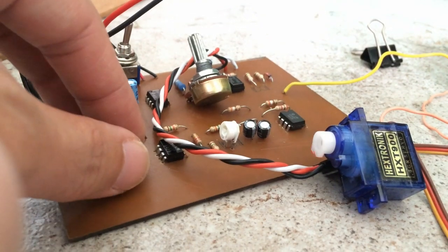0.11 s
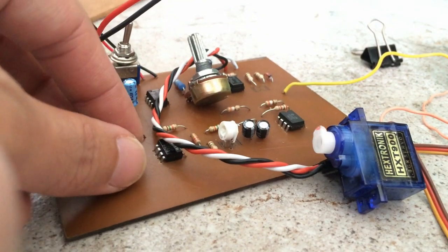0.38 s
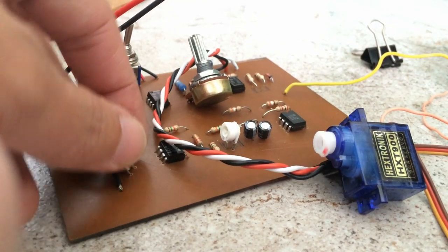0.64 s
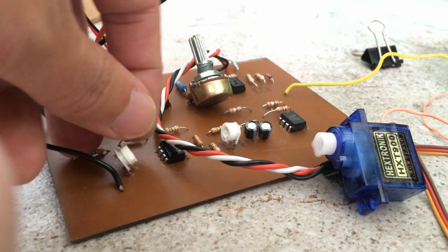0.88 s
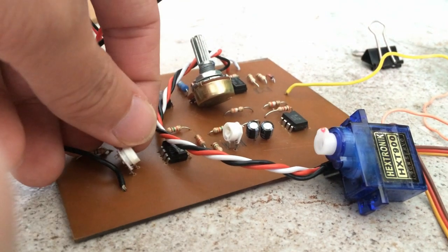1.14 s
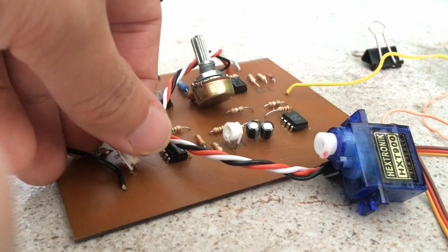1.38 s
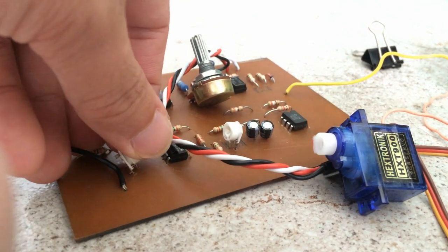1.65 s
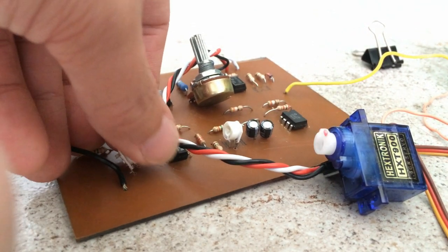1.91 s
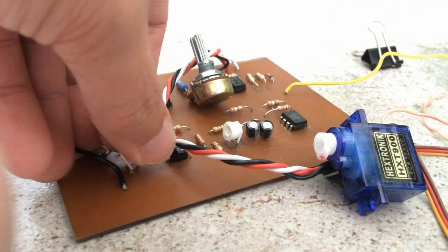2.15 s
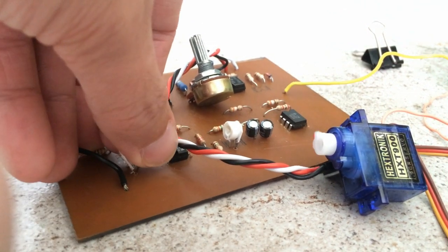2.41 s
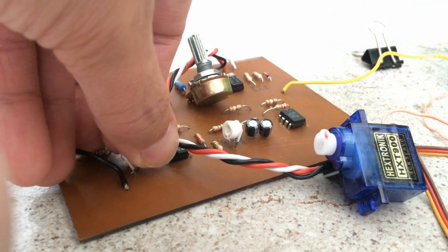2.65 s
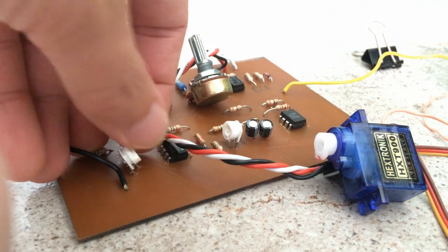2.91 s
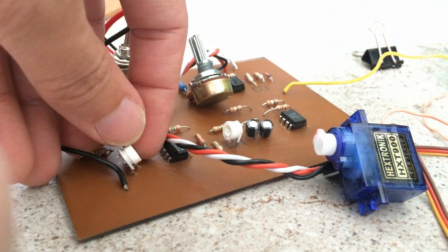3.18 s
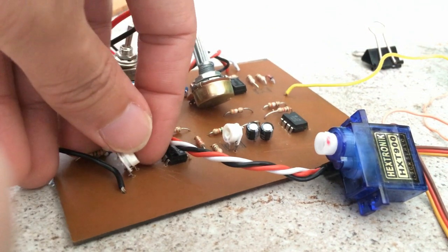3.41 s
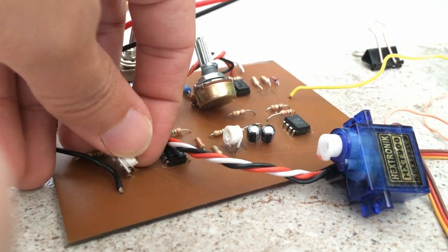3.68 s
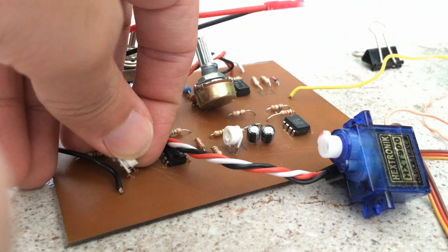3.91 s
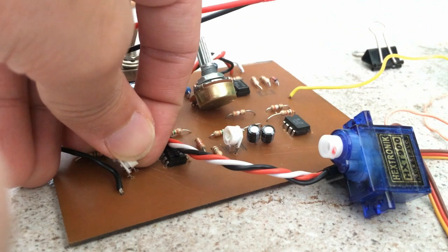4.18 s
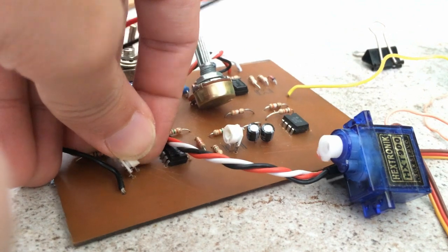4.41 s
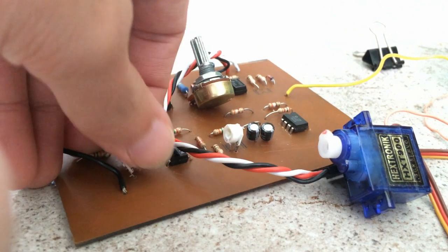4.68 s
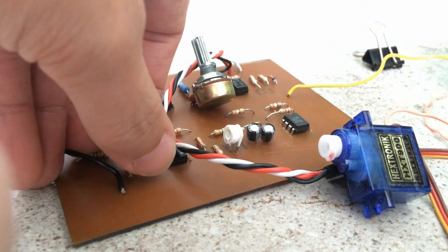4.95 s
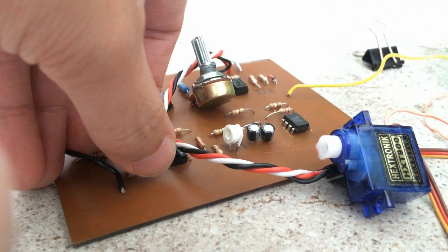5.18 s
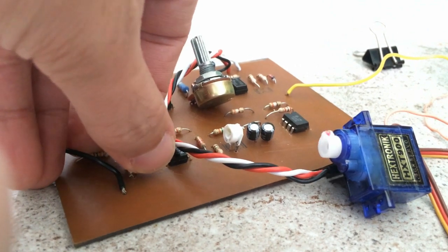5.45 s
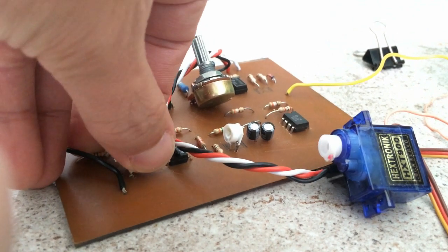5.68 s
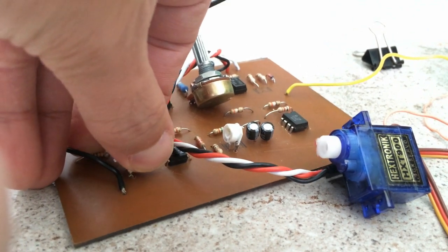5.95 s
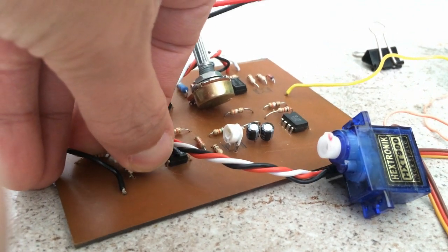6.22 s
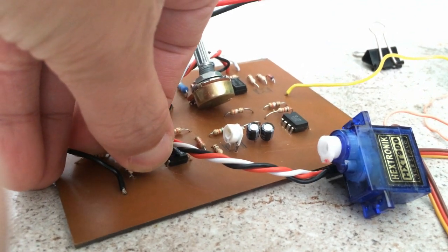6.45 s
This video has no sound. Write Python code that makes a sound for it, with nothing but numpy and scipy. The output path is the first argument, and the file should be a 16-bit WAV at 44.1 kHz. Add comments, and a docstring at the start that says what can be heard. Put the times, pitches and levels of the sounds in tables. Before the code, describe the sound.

Continuous dry buzz and rattle of a tiny gear motor, pulsing quickly with each gear turn, its tone shifting slightly above a quiet low hum.

```python
"""A small geared servo rattles steadily close by: noise for its plastic teeth, swelling with each turn of the
gears, filtered by case resonances. Thin motor whines, sines locked to the shaft, lie under it.
A hand beside it shifts and rests, changing the rattle's colour.
Behind are a filtered-noise room rumble, a mains hum and low drones that glide. Mono."""
import sys
import numpy as np
from scipy import signal
from scipy.fft import rfft, irfft, next_fast_len
from scipy.io import wavfile
from scipy.ndimage import uniform_filter1d, map_coordinates

SR = 44100
rng = np.random.default_rng(int(sys.argv[2]) if len(sys.argv) > 2 else 0)


def put_to_file(sound):
    """Save the sound as 16-bit audio at rate SR, in the file named by the first command-line argument."""
    columns = np.atleast_2d(sound).T  # one column per channel
    safe = np.clip(columns, -1, 1)
    whole_steps = np.round(safe * 32767)
    wavfile.write(sys.argv[1], SR, whole_steps.astype(np.int16))


def invert_db(level):
    """Linear amplitude ratio for a level in decibels (20 dB per decade), elementwise."""
    return 10 ** (np.asarray(level, dtype=float) / 20)


N = 290178
TIME = np.arange(N) / SR
MOTOR_HZ = 226.28  # shaft turns a second, before sway and slowing

# Rattle modulation: output gear, third gear, first gear and its overtones, slow mesh, their sum,
# motor twice a turn. Each row: rate in cycles per motor turn, start phase in turns.
BEATS = [(.0062, -.04), (.02465, -.12), (.19736, .26), (.39475, .33), (.78945, -.13), (1.5789, -.38),
         (.37498, .25), (.5723, -.41), (2.0, -.17)]


def unit(x):
    """Scaled to rms 1."""
    return x / np.sqrt(np.mean(x ** 2, -1, keepdims=True) + 1e-20)


def along(points, hz):
    """Interpolates (Hz, value) points on a log frequency axis."""
    f, v = np.transpose(points)
    return np.interp(np.log(hz + 1), np.log(f + 1), v)


def peaks(modes, hz):
    """Gain in dB of (centre Hz, width Hz, dB) resonances."""
    return sum(db / (1 + (2 * (hz - c) / w) ** 2) for c, w, db in modes)


def wobble(rate_hz):
    """Smooth random curve with rate_hz knots a second."""
    knots = rng.standard_normal(int(N * rate_hz / SR) + 4)
    return map_coordinates(knots, [TIME * rate_hz])


def filtered(x, response):
    """Applies a zero-phase gain, a function of Hz."""
    m = next_fast_len(N + 8192)
    return irfft(rfft(x, m) * response(np.fft.rfftfreq(m, 1 / SR)), m)[..., :N]


def shaft():
    """Motor angle in turns: the integral of a speed that sways and slows slightly."""
    # Motor speed sways with the third gear, the output gear, their difference rate, and a slow drift.
    # Each row: rate in Hz, peak speed swing in Hz, start phase in turns.
    speed_sways = [(1.395, 3.316, .495), (5.577, 2.285, .26), (4.178, .574, .383), (.243, .276, .559)]
    slowing_hz_per_s = -.013
    speed_hz = MOTOR_HZ + slowing_hz_per_s * TIME
    speed_hz = speed_hz + sum(swing * np.cos(2 * np.pi * (f * TIME + p)) for f, swing, p in speed_sways)
    return np.cumsum(speed_hz) / SR


def hand_position():
    """Hand nearness and main-ring lift in dB per sample, gliding between resting places."""
    # Each row: shift time in s, share of the hand's colour (0-1), lift of the main case ring in dB.
    rests = [(0, 0.2, 1.5), (.8, .3, 4), (1.25, .03, 0.5), (3.13, .4, 6.5), (3.45, 0.83, 3.5),
             (4.0, 0.73, 1.5), (4.72, .28, 1), (5.3, 0.43, 2), (5.56, 0.24, -6)]
    shift_s = 0.084
    start_s, *columns = np.transpose(rests)
    glide = (1 + np.tanh((TIME - start_s[1:, None]) / shift_s * 2)) / 2
    near, lift_db = [c[0] + np.diff(c) @ glide for c in columns]
    return np.clip(near, 0, 1), lift_db


def teeth(swell_db, depth, own_db):
    """Dense tooth contacts: noise whose strength follows the gears and chatters at random."""
    chatter_db = own_db * wobble(400) + 0.62 * wobble(30)
    return unit(invert_db(depth * swell_db + chatter_db) * rng.standard_normal(N))


def ticks(turns):
    """Noise bursts of random strength where a tooth knocks, once a turn of the first gear."""
    knock_db, spread_db = -31.5, 4  # nominal strength before the case, and its scatter
    lead_turns = 0.037  # of the first gear
    rate, phase = BEATS[2]
    start = np.flatnonzero(np.diff(np.floor(rate * turns + phase + lead_turns)))
    blows = np.zeros(N)
    blows[start] = invert_db(knock_db + spread_db * rng.standard_normal(N // 500)[:len(start)])
    t = np.arange(400) / SR
    burst = invert_db(-60 * t / 0.02) * (1 - np.exp(-t / 0.00092))
    return signal.fftconvolve(blows, burst)[:N] * rng.standard_normal(N)


def band_gains(hz):
    """Splits the spectrum into four bands whose powers add up to one."""
    above = [1 / (1 + (edge_hz / (hz + 1)) ** 8) for edge_hz in (3600, 7300, 10800)]
    above = np.array([hz ** 0] + above + [0 * hz])
    return np.sqrt(np.abs(np.diff(above, axis=0)))


def rattle(turns):
    """Tooth noise through the case; the higher the band, the more deeply it swells with the gears."""
    # Rattle spectrum through the case, free and with the hand reflecting it.
    # Each row: frequency in Hz, relative density in dB per Hz.
    case_free = [(1410, -45), (2400, -21.5), (3070, -16), (3370, -15.5), (3810, -14.5), (5400, -5.5),
                 (5970, -6), (6450, -2), (7080, -4), (7760, -3), (8720, -2), (9490, 3), (10700, -3.5),
                 (12300, 0.5), (15200, -11.5)]
    case_hand = [(1410, -49), (2400, -20), (3070, -14.5), (3320, -18.5), (4490, -7.5), (4920, -11),
                 (5240, -8.5), (5790, -7), (6210, -5), (6550, -0.5), (8070, 1), (10400, -2), (11500, -5),
                 (12500, -2), (15200, -15.5)]
    # Narrow case resonances. Each row: centre in Hz, width in Hz, gain in dB.
    narrow_rings = [(3075, 200, 5.5), (4130, 540, 1), (12370, 920, 2), (14760, 430, 7)]
    # Strongest case resonance: centre in Hz, width in Hz, dB against the rattle before the hand's lift.
    ring_hz, ring_width_hz, ring_db = (6436, 850, -13)
    # Peak swing of each BEATS row in dB, before the depth of each band.
    beat_swing_db = [0.52, 0.61, 1.07, 0.55, 0.78, 0.2, 1.06, 0.1, 0.49]
    rattle_db, shade_db = -24.5, 1.3  # level with no hand, and what a near hand takes from it

    near, lift_db = hand_position()
    level_db = rattle_db - shade_db * near + 0.16 * wobble(2.5)
    swell_db = sum(db * np.cos(2 * np.pi * (k * turns + p)) for (k, p), db in zip(BEATS, beat_swing_db))
    swell_db = swell_db + 0.72 * wobble(250) + 0.17 * wobble(40)  # uneven contacts shake the whole case

    drive = np.array([teeth(swell_db, depth, own_db=-0.35) for depth in (.45, .8, 1.05, 1.4)])
    drive = drive + ticks(turns) / invert_db(level_db)

    def through(case):
        bands = filtered(drive, lambda hz: invert_db(along(case, hz) + peaks(narrow_rings, hz)) * band_gains(hz))
        return unit(bands.sum(0))

    colour = (1 - near) * through(case_free) + near * through(case_hand)
    ring_drive = teeth(swell_db, .9, own_db=0.8)
    ring = unit(filtered(ring_drive, lambda hz: 1 / (1 + (2 * (hz - ring_hz) / ring_width_hz) ** 2)))
    return invert_db(level_db) * (colour + invert_db(ring_db + lift_db) * ring)


def whine(turns):
    """Thin tones locked to the motor shaft, stronger when it runs fast."""
    # Motor orders of unbalance, commutator and pinion mesh, in cycles per turn.
    orders = [2, 6, 10]
    # Nominal level of each order in dB rms, before speed and waver.
    order_db = [-58, -58, -57.5]
    excess_hz = np.gradient(turns) * SR - MOTOR_HZ
    mix = 0
    for order, db in zip(orders, order_db):
        level = np.sqrt(2) * invert_db(db + 0.22 * excess_hz + 0.6 * wobble(9))
        mix = mix + level * np.sin(2 * np.pi * (order * turns + 0.025 * wobble(40)))
    return mix


def uneven_noise(depth_db):
    """Noise thinned and thickened at random in patches of about 130 Hz by 35 ms."""
    z = signal.stft(rng.standard_normal(N + 1024), nperseg=1024)[2]
    field = uniform_filter1d(rng.standard_normal(z.shape), size=3, axis=0)
    field = uniform_filter1d(field, size=3, axis=1)
    return unit(signal.istft(z * invert_db(depth_db * field / field.std()), nperseg=1024)[1][:N])


def rumble():
    """Noise shaped by room resonances; the part below about 90 Hz sways apart from the rest."""
    # Room spectrum. Each row: frequency in Hz, relative density in dB per Hz.
    room_spectrum = [(13, -48), (25, -24), (45, -15), (90, -11), (180, -5.5), (230, -11.5), (330, -17),
                     (500, -17), (860, -23), (1080, -26.5), (1500, -26.5), (2100, -26.5), (2800, -22),
                     (5000, -60)]
    # Room resonances. Each row: centre in Hz, width in Hz, gain in dB.
    room_modes = [(50.3, 5.3, 7.5), (68.5, 16, 10), (125, 6.4, 0), (193.6, 32, 5.5), (285, 8.9, 4),
                  (419, 27, 6.5), (608, 43, 3.5), (869, 38, 4), (1270, 180, 4), (1680, 120, 3)]
    rumble_db = -46.5  # rms between 220 and 1200 Hz, before sway

    def shape(hz):
        deep = 1 / (1 + (hz / 90) ** 6)
        return invert_db(along(room_spectrum, hz) + peaks(room_modes, hz)) * np.sqrt([deep, 1 - deep])

    low, rest = filtered(np.array([uneven_noise(depth_db=0.7), uneven_noise(depth_db=2.5)]), shape)
    scale = np.std(filtered(rest, lambda hz: (hz > 220) & (hz < 1200)))
    low_sway = invert_db(1.5 * wobble(2.14) + 0.88 * wobble(4.9))
    rest_sway = invert_db(0.64 * wobble(5.02))
    return invert_db(rumble_db) * (low_sway * low + rest_sway * rest) / scale


def mains_hum():
    """Steady sine of the mains."""
    # Frequency in Hz, level in dB rms.
    hum_hz, hum_db = (100, -50)
    return np.sqrt(2) * invert_db(hum_db) * np.sin(2 * np.pi * hum_hz * TIME)


def drone(start_s, end_s, from_hz, to_hz, db, waver_db, blur_turns):
    """Low sine that glides, wavers in level and phase, and fades in and out around its span."""
    fade_s = 0.27
    hz = np.interp(TIME, [start_s, end_s], [from_hz, to_hz])
    edge = np.interp(TIME, [start_s - fade_s, start_s, end_s, end_s + fade_s], [0, 1, 1, 0])
    level = np.sqrt(2) * edge * invert_db(db + waver_db * wobble(8))
    return level * np.sin(2 * np.pi * (np.cumsum(hz) / SR + blur_turns * wobble(9)))


def room():
    """Sum of broad rumble, mains hum and gliding drones."""
    # Each row: start in s, end in s, start in Hz, end in Hz, level in dB rms before waver.
    drone_spans = [(0, 3.15, 182, 195, -42.5), (4, 5.0, 192, 188, -47), (3, 4.7, 146, 156, -44),
                   (5.5, 5.7, 178, 172, -41.5), (6, 6.58, 182, 182, -42.5)]
    drones = sum(drone(*row, waver_db=1.5, blur_turns=0.11) for row in drone_spans)
    return rumble() + mains_hum() + drones


def scene():
    """One microphone: both channels alike."""
    turns = shaft()
    mono = rattle(turns) + whine(turns) + room()
    return np.array([mono, mono])


def top_cut(x):
    """Nothing passes above the cut-off."""
    return signal.sosfilt(signal.butter(12, 15930, fs=SR, output="sos"), x)


def record(dry):
    """The recorder cuts everything from 15310 Hz up."""
    mix = filtered(dry, lambda hz: hz < 15310)
    return top_cut(mix)


dry = scene()
out = record(dry)
put_to_file(out)
```